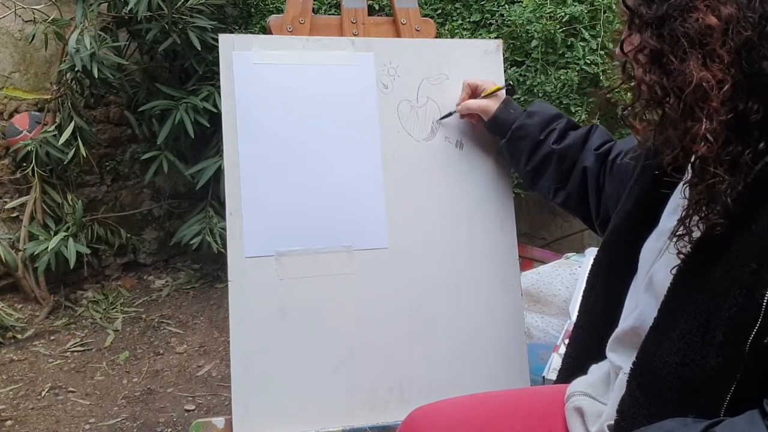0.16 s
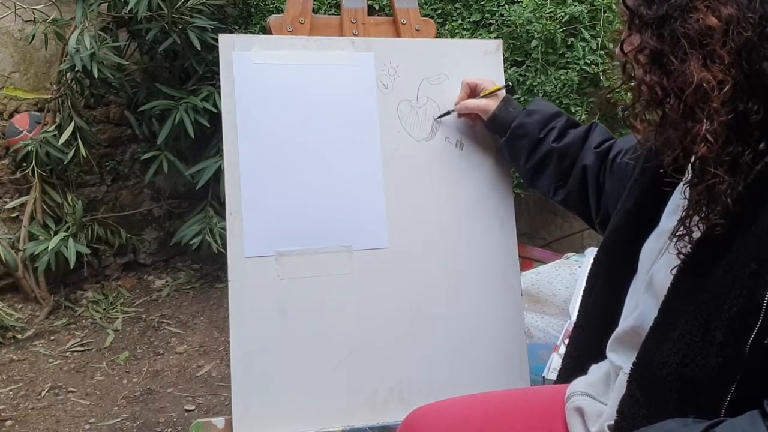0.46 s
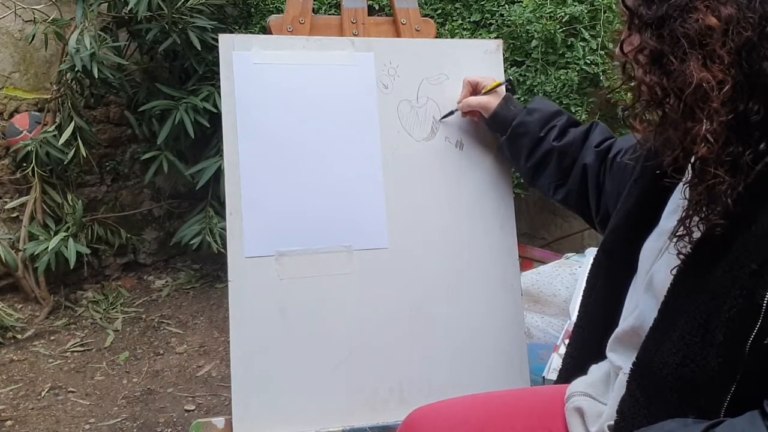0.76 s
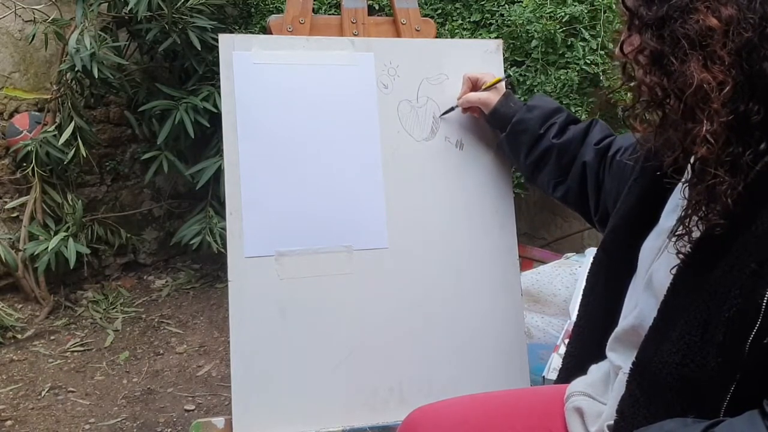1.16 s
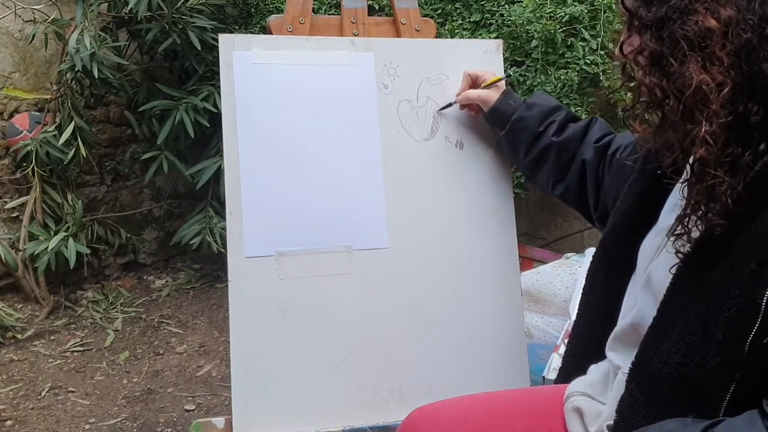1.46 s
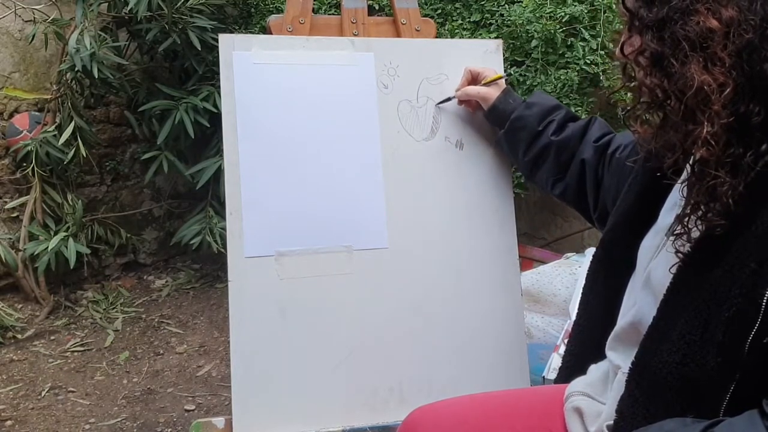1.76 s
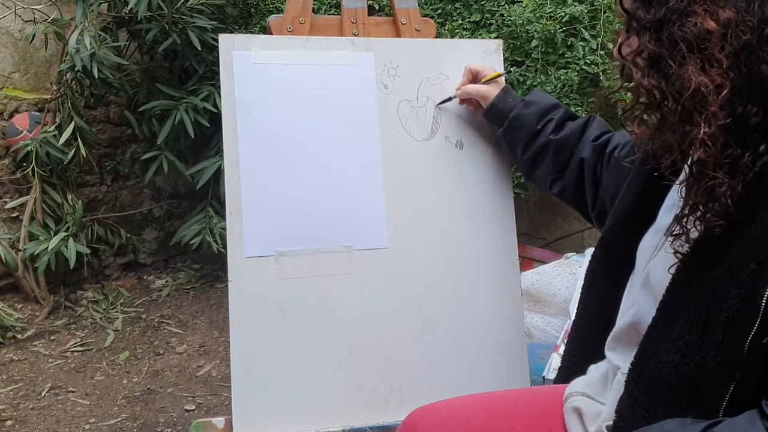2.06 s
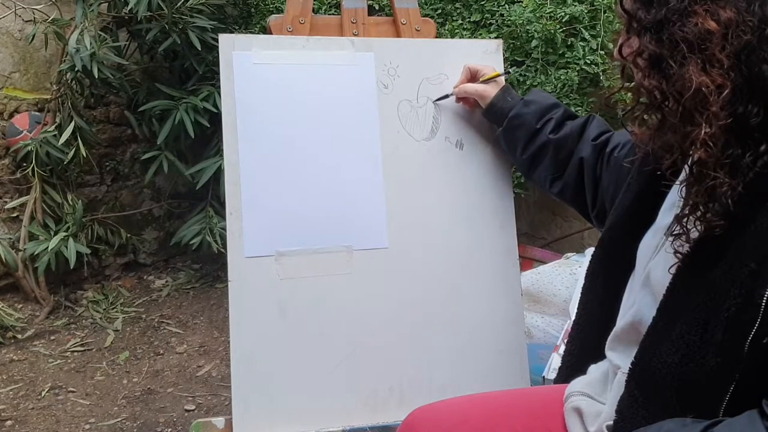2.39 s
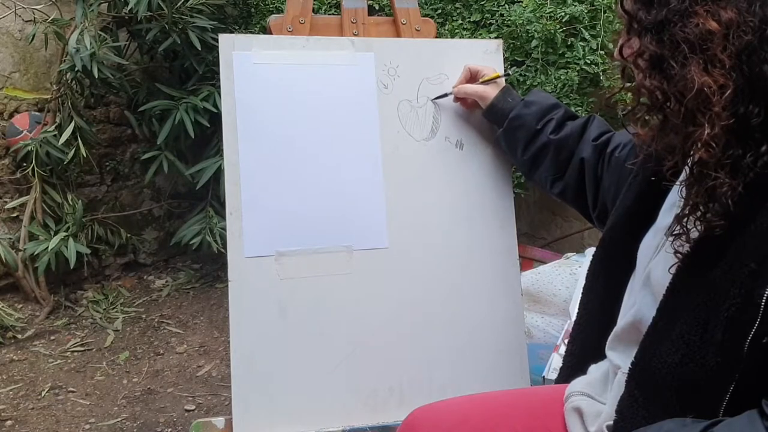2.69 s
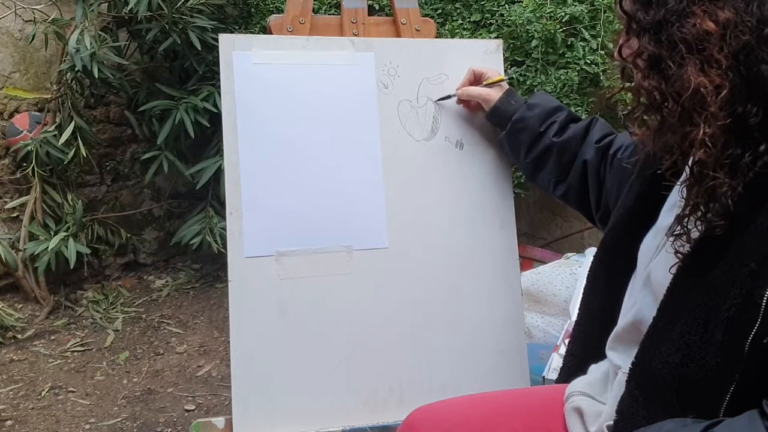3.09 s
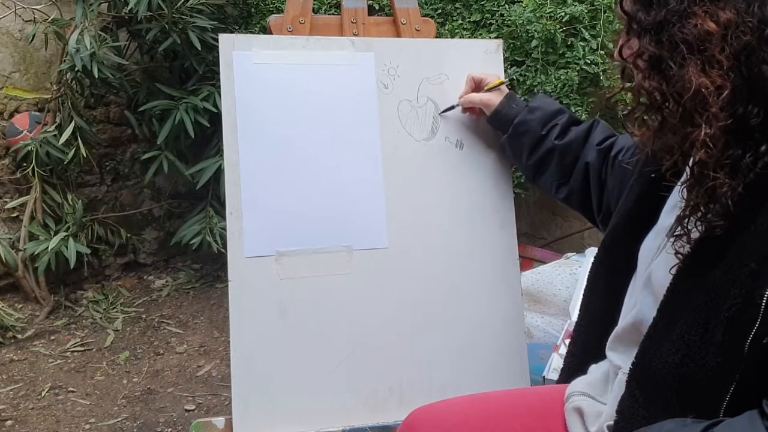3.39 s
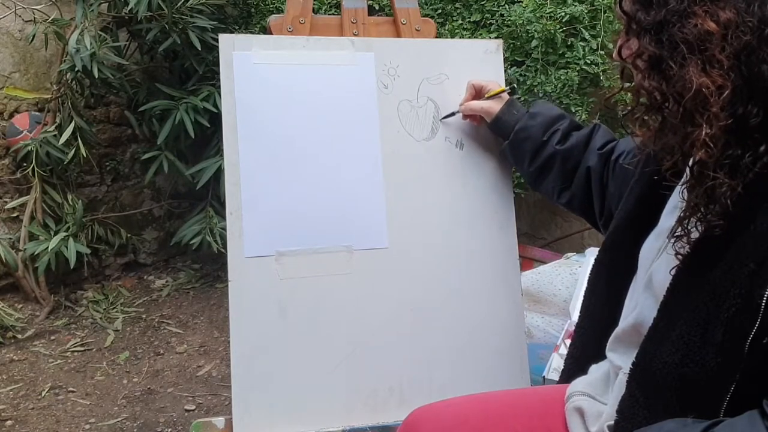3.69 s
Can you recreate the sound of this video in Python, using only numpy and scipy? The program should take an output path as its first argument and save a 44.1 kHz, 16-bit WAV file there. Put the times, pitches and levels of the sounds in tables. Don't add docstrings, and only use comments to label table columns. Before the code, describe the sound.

A pencil scratches rapidly to and fro on an easel board, slightly left, then lightens, taps once and resumes; far traffic and engines rumble in a garden, with soft hiss on a handheld stereo recorder.

```python
import sys
import numpy as np
from scipy import signal
from scipy.fft import rfft, irfft, next_fast_len
from scipy.io import wavfile
from scipy.ndimage import uniform_filter1d, map_coordinates

SR = 44100
rng = np.random.default_rng(int(sys.argv[2]) if len(sys.argv) > 2 else 0)


def master_out(mix):
    frames = np.transpose(np.atleast_2d(mix))
    ceiling = np.clip(frames, -1, 1)
    pcm = np.round(ceiling * 32767).astype(np.int16)
    wavfile.write(sys.argv[1], SR, pcm)


def invert_db(level):
    return 10 ** (np.asarray(level, dtype=float) / 20)


N = 169785


def unit(x):
    return x / np.sqrt(np.mean(x ** 2, axis=-1, keepdims=True) + 1e-30)


def along(points, hz):
    f, value = np.transpose(points)
    return np.interp(np.log(hz + 1), np.log(f + 1), value)


def curve(points):
    return np.interp(np.arange(N) / SR, *np.transpose(points))


def wobble(rate):
    knots = rng.standard_normal(int(N * rate / SR) + 4)
    return map_coordinates(knots, [np.arange(N) * rate / SR])


def filtered(x, response):
    m = next_fast_len(N + SR // 2)
    return irfft(rfft(x, m) * response(np.fft.rfftfreq(m, 1 / SR)), m)[..., :N]


def resonance(f, centre, width):
    return 1j * f * width / (centre * centre - f * f + 1j * f * width)


def body(peaks):
    def raw(f):
        return sum((-1) ** k * invert_db(db) * resonance(f, c, w) for k, (c, w, db) in enumerate(peaks))
    gain = np.sqrt(np.mean(abs(raw(np.linspace(0, SR / 2, num=999))) ** 2))
    return lambda f: raw(f) / gain


def noise(response, channels=1):
    size = 1 << 18
    x = irfft(rfft(rng.standard_normal((channels, size))) * response(np.fft.rfftfreq(size, 1 / SR)))
    return x[..., :N] / np.sqrt(np.mean(x ** 2) * channels)


def coloured(spectrum):
    return noise(lambda f: invert_db(along([(0, -120)] + list(spectrum), f)))[0]


def patchy(x, depth_db, frames=7, channels=2):
    z = signal.stft(x, nperseg=256)[2]
    field = rng.standard_normal(z[:channels].shape)
    field = uniform_filter1d(field, 4, -2)
    field = uniform_filter1d(field, frames, -1)
    return signal.istft(z * invert_db(depth_db * field / field.std()), nperseg=256)[1][..., :N]


def tooth():
    grains_per_s, spread_db, clump_db = 10000, 2.5, 1.1
    hit = rng.random(N) < grains_per_s / SR
    uneven_db = spread_db * rng.standard_normal(N) / 2 + clump_db * wobble(120)
    return unit(hit * rng.standard_normal(N) * invert_db(uneven_db))


# (middle t/s, length/s, level/dB, board over tip/dB, left over right/dB)
SHADING_STROKES = [(0.006, 0.046, -64, -4, 10), (0.087, 0.09, -64, -8, 9), (0.204, 0.087, -69, -10, 12),
                   (0.293, 0.075, -65, -8, 9), (0.404, 0.085, -67.5, -7.5, 7), (0.502, 0.11, -71, -6, 10),
                   (0.615, 0.09, -69, -4, 6), (0.707, 0.079, -68, -9.5, 10), (0.818, 0.079, -67.5, -10, 8),
                   (0.919, 0.088, -67.5, -7.5, 8), (1.026, 0.09, -67.5, -5.5, 10),
                   (1.102, 0.081, -70, -4, 13), (1.221, 0.072, -68, -7, 8), (1.296, 0.071, -69.5, -11, 7),
                   (1.411, 0.069, -64, -10.5, 11), (1.488, 0.077, -68, -7.5, 7),
                   (1.59, 0.078, -68.5, -7, 7), (1.67, 0.079, -71, -5, 7), (1.783, 0.091, -71, -10, 6),
                   (1.852, 0.051, -71, -7, 9), (1.965, 0.071, -72, -7, 9)]
TOUCH_UP_STROKES = [(2.044, 0.093, -78, -5, 10), (2.187, 0.19, -81, -1.5, 4), (2.319, 0.063, -79, -3, 5),
                    (2.38, 0.08, -77, -6, 8), (2.524, 0.064, -84, 5, 12), (2.934, 0.13, -75.5, -3.5, 6),
                    (3.03, 0.075, -74.5, -5, 11), (3.174, 0.094, -75, -11, 8), (3.279, 0.091, -76.5, -7, 5),
                    (3.378, 0.075, -67, -8, 10), (3.533, 0.13, -69, -5, 15), (3.632, 0.043, -72, -15, 11),
                    (3.725, 0.1, -69.5, -7, 10), (2.61, 0.083, -84, -2, 6), (3.446, .06, -74, -10, 8),
                    (3.818, .08, -79, -6, 8)]
STROKE_TILT = [-0.22, 0.3, 0.1, 0.25, -0.068, 0.16, -0.035, 0.031, 0.11, 0.38, 0.17, 0.52, -0.22, 0.23,
               -0.43, -0.25, -0.41, 0.4, -0.14, -0.041, -0.25, 0.1, 0.91, 0.79, 0.58, 1.06, 0.21, -0.22,
               -0.11, -0.057, 0.27, 0.26, -0.0045, 0.35]
# (t/s, level/dB, board over tip/dB, left over right/dB, rise/s)
CATCHES = [
    (.811, -69, -12, 8, .001),
    (.822, -69.5, 6, 12, 0.02),
    (1.396, -58, -18, 0, .003),
    (1.775, -73, 1, 14, 0.009),
    (.066, -66, -12, 6, .003),
    (.272, -67, -12, 7, .003),
    (.887, -69, -12, 6, .003),
    (3.689, -69, -12, 8, .003),
]


def pressure():
    t = np.arange(N) / SR
    speeding_up, edge = 0.43, 1.11
    tilt_gain, tilt_glide = 1.8, 0.92
    t60_s = np.array([[0.043], [0.15]])
    board_pan = 0.47

    def share(db, board_db, pan_db):
        levels = np.array([[0, -pan_db], [board_db, board_db - board_pan * pan_db]])
        return invert_db(db + levels)[..., None] ** 2

    power = np.full((2, 2, N), invert_db(-93.5) ** 2)
    tilt = np.zeros(N)
    strokes = list(SHADING_STROKES) + list(TOUCH_UP_STROKES)
    for (mid, length, db, board_db, pan_db), upright in zip(strokes, list(STROKE_TILT) + [0, 0, 0]):
        corners = mid + 1.27 * length * (np.array([0, speeding_up, 1]) - .47)
        speed = np.interp(t, corners, [0, 1, 0])
        swell = share(db, board_db, pan_db) * np.sin(np.pi / 2 * np.minimum(edge * speed, 1)) ** 2
        power += swell
        tilt += swell[0, 0] * (tilt_gain * upright + tilt_glide * (t - mid) / length)
    for s, db, board_db, pan_db, rise in CATCHES:
        fall = invert_db(-60 * np.clip(t - s - rise, 0, 1) / t60_s) * np.clip((t - s) / rise, 0, 1)
        power += share(db, board_db, pan_db) * fall[:, None] ** 2
    tip, board = np.sqrt(power)
    return tip, board, np.clip(tilt / power[0, 0], -1, 1)


def tilted(x, peaks, tilt, shift, upper_db):
    out = 0
    for k in (-1, 0, 1):
        moved = [(c * (1 + k * shift * (c < 14000)), w, db + k * upper_db * (12000 < c < 14000))
                 for c, w, db in peaks]
        out = out + filtered(x * np.clip(1 - abs(tilt - k), 0, 1), body(moved))
    return out


# (f/Hz, width/Hz, level/dB)
TIP_LEFT = [(9630, 1600, -11), (11420, 1270, 6), (12700, 1200, -5), (15800, 1700, -1.5)]
TIP_RIGHT = [(10870, 850, -1.5), (12600, 1000, -8), (15400, 1100, -13)]
BOARD_LEFT = [(1220, 1300, 1.5), (3350, 860, -4), (4130, 530, -1), (4930, 420, -1), (5690, 380, 1),
              (6660, 630, -2), (7260, 770, -0.5)]
BOARD_RIGHT = [(1190, 720, 3), (3150, 1700, 3.5), (4250, 940, 6), (6640, 1100, 0)]


def pencil():
    shared, right_lag_s = .3, -.00027
    ticks = tooth()
    ahead = filtered(ticks, lambda f: np.exp(-2j * np.pi * f * right_lag_s))
    left, right = ticks, np.sqrt(shared) * ahead + np.sqrt(1 - shared) * tooth()
    tip, board, tilt = pressure()
    # share of pitch change, and gain in dB of the mode between 12 and 14 kHz
    point = np.array([tilted(left * tip[0], TIP_LEFT, tilt, 0.047, 3),
                      tilted(right * tip[1], TIP_RIGHT, tilt, .01, 7)])
    panel = np.array([filtered(left * board[0], body(BOARD_LEFT)),
                      filtered(right * board[1], body(BOARD_RIGHT))])
    return patchy(point, 1.6) + patchy(panel, 1.2)


# (middle t/s, length/s, level/dB)
SQUEAKS = [
    (.225, .04, -78),
    (1.03, .04, -79),
    (1.231, 0.034, -80),
    (1.296, .04, -82),
    (1.426, 0.041, -79),
    (1.785, .03, -74),
    (1.844, .04, -79),
    (1.966, .06, -79),
]


def squeaks():
    t = np.arange(N) / SR
    swell = sum(invert_db(db) * np.exp(-(2 * (t - s) / length) ** 2) for s, length, db in SQUEAKS)
    mode = body([(5660, 230, 0)])
    return filtered(swell * tooth(), mode) * invert_db([[0], [-17]])


# (f/Hz, width/Hz, level/dB)
TAP_LEFT = [(4300, 600, -3), (5900, 1000, -1), (11100, 1600, 4), (15000, 2200, -5)]
TAP_RIGHT = [(4270, 700, 2), (6000, 1200, -2), (11350, 2500, -7)]
TAP_SCRAPE = [(4200, 460, 0), (4970, 500, 0.5), (6060, 670, 0), (10800, 1100, 2.5)]


def tap():
    tap_s, bounce_s, crack_t60_s, scrape_t60_s = 3.461, 0.0034, 0.032, 0.33
    u = np.clip(np.arange(N) / SR - tap_s, 0, 9)
    touches = ((0, -6), (bounce_s, 0))  # delay/s, level/dB
    crack = sum(invert_db(db - 60 * (u - d) / crack_t60_s) * (u > d) for d, db in touches)
    scrape = invert_db(-68 - 60 * u / scrape_t60_s) * (u > 0)
    ears = []
    for db, peaks in ((-59, TAP_LEFT), (-69.5, TAP_RIGHT)):
        ringing = invert_db(db) * filtered(crack * tooth(), body(peaks))
        ears.append(ringing + filtered(scrape * tooth(), body(TAP_SCRAPE)))
    return np.array(ears)


# (f/Hz, width/Hz, depth 0-1)
CASE_DIPS = [
    [(7620, 1100, 0.58), (13600, 730, 0.3)],
    [(8900, 2000, 0.9), (13800, 1400, 0.6)],
]


def shadowed(x):
    def dips(f, ear):
        return np.prod([1 - depth * resonance(f, c, w) for c, w, depth in ear], axis=0)
    return filtered(x, lambda f: np.array([dips(f, ear) for ear in CASE_DIPS]))


# (t/s, third order f/Hz, level/dB)
ENGINE_DRONE = [(0, 64, -48), (.35, 65, -49.5), (.6, 66.5, -45.5), (.78, 66.5, -46.5), (.95, 66, -41),
                (1.12, 66.5, -42.5), (1.22, 66.5, -58), (1.4, 66.5, -50.5), (1.601, 67, -45.5),
                (1.8, 66.5, -47), (2.05, 66, -55.5), (2.3, 67, -48), (2.7, 65, -60), (3.2, 67, -47.5),
                (3.45, 69, -47.5), (3.85, 67, -62.5)]


def engine():
    s, hz, db = np.transpose(ENGINE_DRONE)
    t = np.arange(N) / SR
    turn = 2 * np.pi * np.cumsum(np.interp(t, s, hz) + 0.92 * wobble(4.81)) / SR
    third = invert_db(np.interp(t, s, db) + 1.1 * wobble(8.91)) * np.sin(turn)
    second = invert_db(np.mean(db) - 6 + 2.5 * wobble(4)) * np.sin(turn * 2 / 3)
    return np.sqrt(2) * (third + second) * invert_db([[1], [-1]])


# (t/s, f/Hz, level/dB)
LORRY_DRONE = [
    (0, 57, -77),
    (.25, 60, -51),
    (.45, 58.4, -73),
    (2.2, 55, -61),
    (2.45, 55.7, -53.5),
    (2.75, 54, -47),
    (3, 56.9, -58.5),
    (3.3, 53.6, -53),
    (3.6, 55.4, -64),
    (3.85, 53.2, -50),
]


def lorry():
    s, hz, db = np.transpose(LORRY_DRONE)
    t = np.arange(N) / SR
    turn = 2 * np.pi * np.cumsum(np.interp(t, s, hz)) / SR
    level = invert_db(np.interp(t, s, db) + 1.2 * wobble(23))
    return np.sqrt(2) * level * np.sin(turn) * invert_db([[1], [-1]])


# (f/Hz, level/dB per Hz)
ROAD_SPECTRUM = [(33, -27), (41, 0), (75, -3), (102, -5), (135, -8.5), (220, -10), (700, -20),
                 (1900, -39.5)]
# (f/Hz, likeness -1 to 1)
ROAD_LIKENESS = [(60, 1), (130, 0.89), (290, 0.85), (640, 0.4), (1400, -0.27), (3000, 0.14)]
# (f/Hz, left over right/dB)
ROAD_LEAN = [(60, 2), (200, 1.3), (400, 3), (700, 3), (1300, 7.5), (2000, 12.5)]
# (t/s, level/dB)
ROAD_SWELL = [
    (0, -57),
    (.8, -58.5),
    (1.5, -57.5),
    (2.1, -58),
    (2.6, -59),
    (3.3, -57),
    (3.85, -58.5),
]


def traffic():
    def road(f):
        return invert_db(along([(0, -120)] + list(ROAD_SPECTRUM) + [(3000, -65), (6000, -120)], f))

    def spread(f):
        return np.arccos(np.clip(along(ROAD_LIKENESS, f), -1, 1)) / 2

    mid, side = noise(lambda f: road(f) * [np.cos(spread(f)), np.sin(spread(f))], channels=2)
    ears = np.array([mid + side, mid - side])
    ears = filtered(ears, lambda f: invert_db(np.outer([.5, -.5], along(ROAD_LEAN, f))))
    swell_db = curve(ROAD_SWELL)
    level_db = -49.5 + swell_db - swell_db.mean() + .5 * wobble(4.71)
    return np.sqrt(2) * invert_db(level_db) * patchy(ears, .6, frames=43, channels=1)


# (f/Hz, width/Hz, level/dB)
PORT_CAVITY = [(2024, 170, -9), (2290, 252, 2.5), (2688, 200, -11.5)]


def port():
    ring = body(PORT_CAVITY)
    edge_hz = 2810
    singing = noise(lambda f: ring(f) ** 2 / (1 + (f / edge_hz) ** 40))
    return invert_db(-65.5) * patchy(singing, .7, frames=30) * np.array([[1], [0]])


HISS_LEVELS = [-74, -75]
# (f/Hz, level/dB per Hz)
HISS_LEFT = [(2600, 1.5), (4000, -5), (5500, -8.5), (7800, -11), (9500, -5.5), (11300, 2.5), (13500, -3.5),
             (15700, -2)]
HISS_RIGHT = [(1500, 3), (2500, 0), (5000, -5), (7200, -6.5), (9000, -16.5), (11000, -1.5), (13500, -1.5),
              (16000, 1)]
# (t/s, level/dB)
LEAF_AIR = [
    (0, 0.5),
    (1.1, 1.5),
    (1.8, 0),
    (2.35, -.5),
    (2.75, -2),
    (3, -.5),
    (3.85, -.5),
]


def hiss():
    ears = patchy(np.array([coloured(HISS_LEFT), coloured(HISS_RIGHT)]), -0.5)
    return invert_db(HISS_LEVELS)[:, None] * ears * invert_db(curve(LEAF_AIR))


def scene():
    return shadowed(pencil() + squeaks() + tap()) + engine() + lorry() + traffic()


def band_limit(x):
    return signal.sosfilt(signal.butter(12, 16820, fs=SR, output="sos"), x)


def record(dry):
    join_hz, join_db, top_hz = 15200, -9, 15720
    both = dry + hiss() + port()
    side = (both - both[::-1]) / 2
    both = both - filtered(side, lambda f: (f > join_hz) * (1 - invert_db(join_db)))
    mix = filtered(both, lambda f: f < top_hz)
    return band_limit(mix)


dry = scene()
out = record(dry)
master_out(out)
```